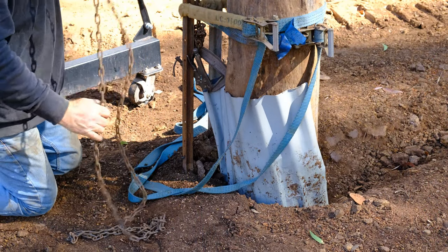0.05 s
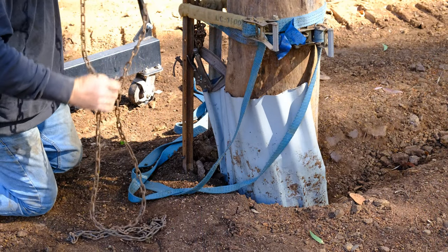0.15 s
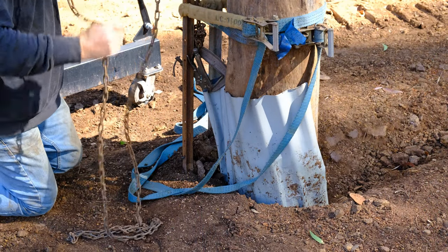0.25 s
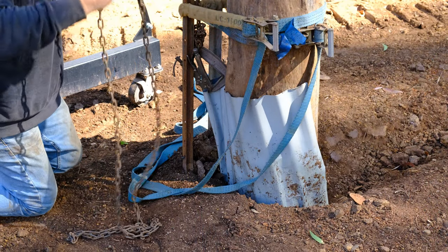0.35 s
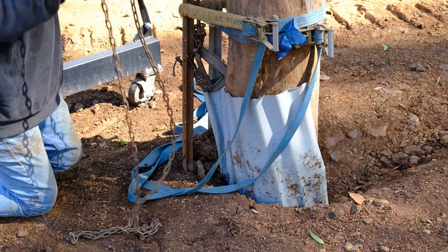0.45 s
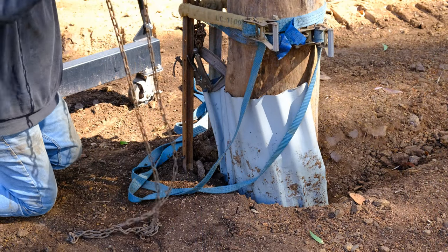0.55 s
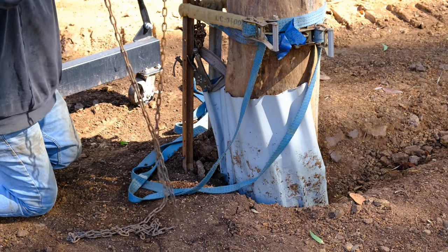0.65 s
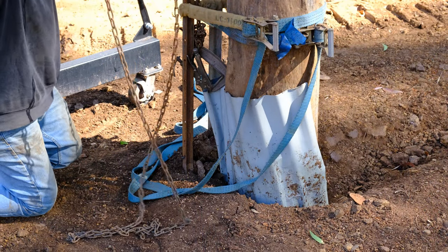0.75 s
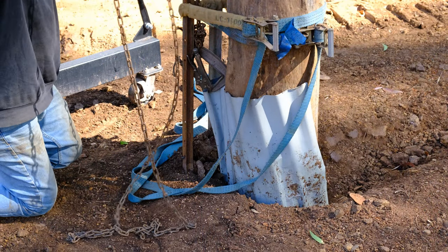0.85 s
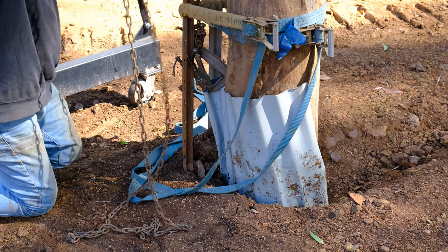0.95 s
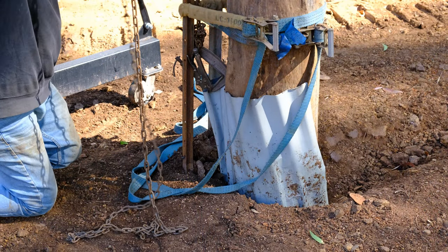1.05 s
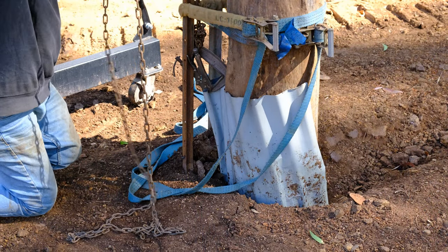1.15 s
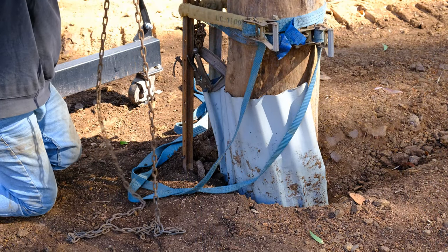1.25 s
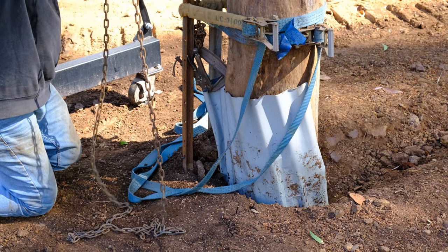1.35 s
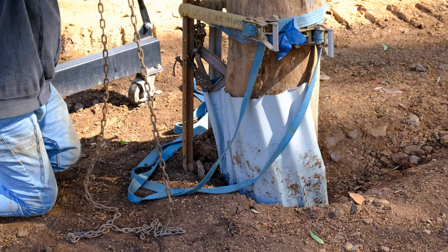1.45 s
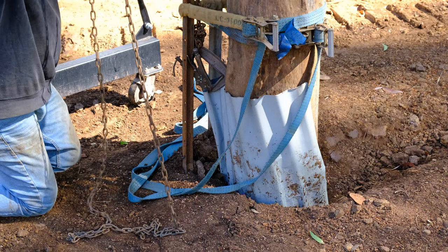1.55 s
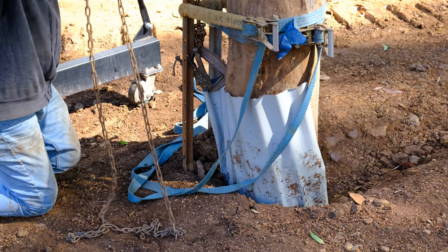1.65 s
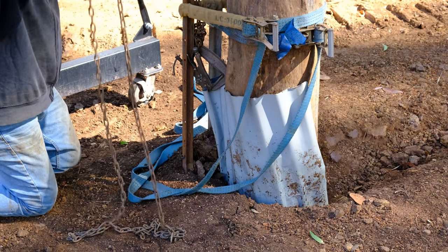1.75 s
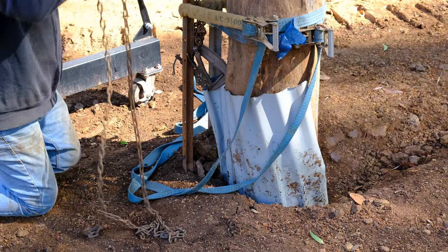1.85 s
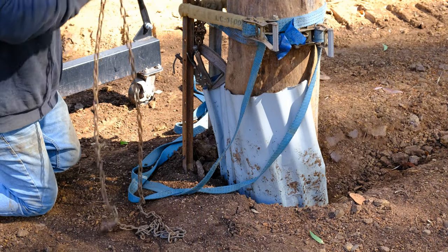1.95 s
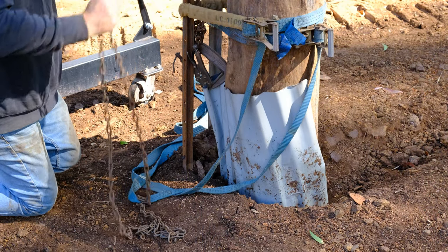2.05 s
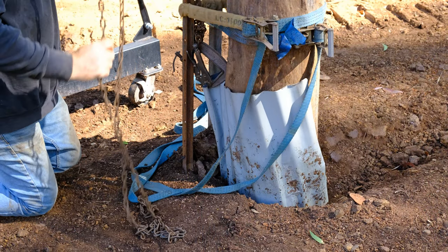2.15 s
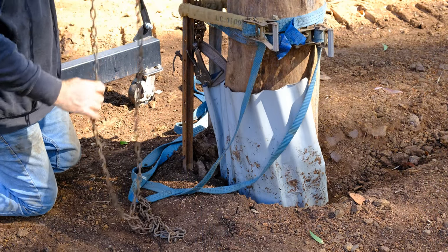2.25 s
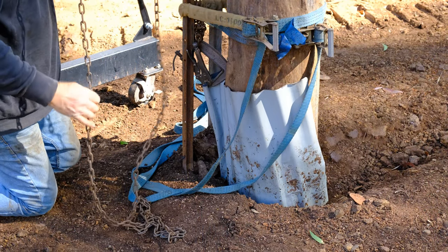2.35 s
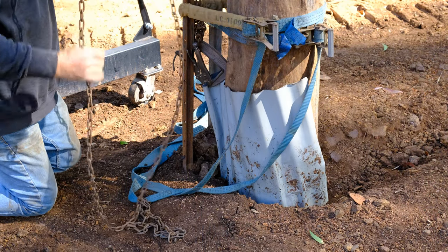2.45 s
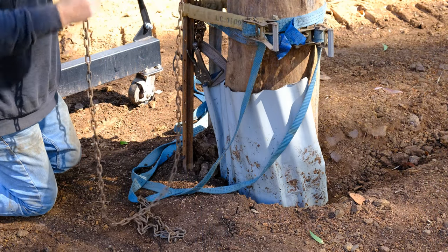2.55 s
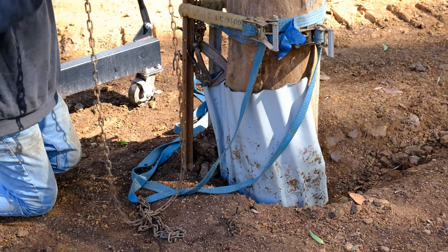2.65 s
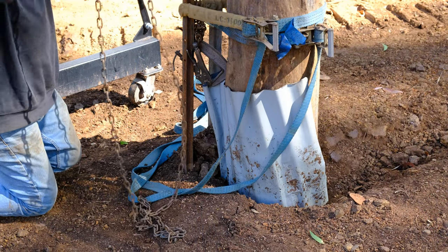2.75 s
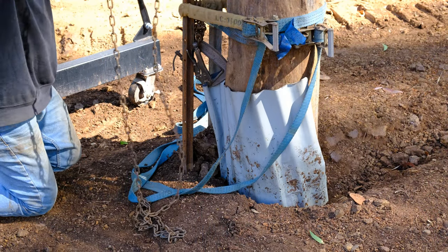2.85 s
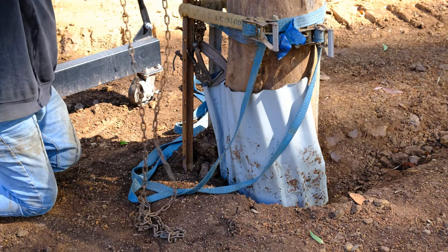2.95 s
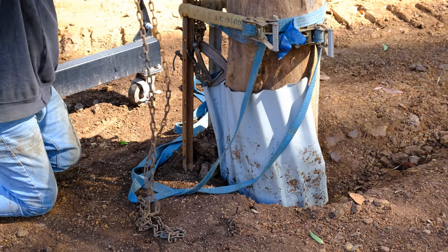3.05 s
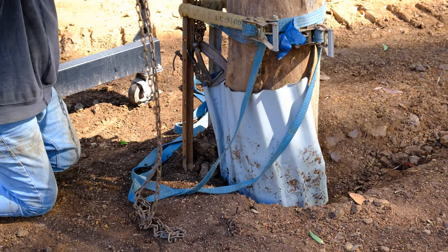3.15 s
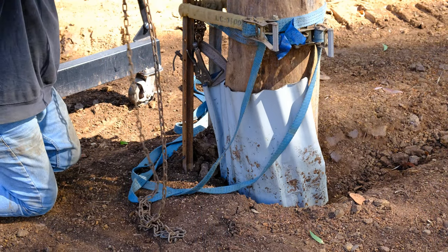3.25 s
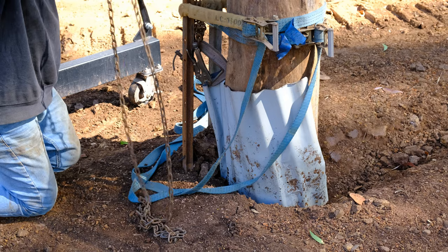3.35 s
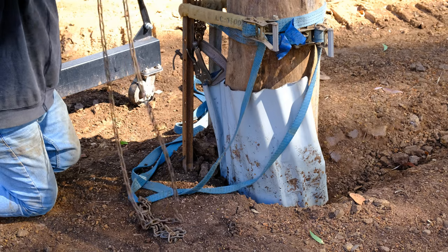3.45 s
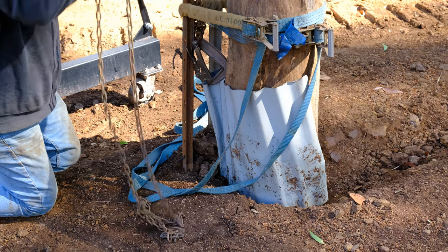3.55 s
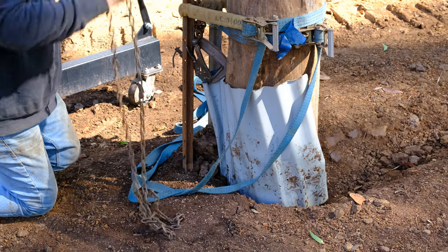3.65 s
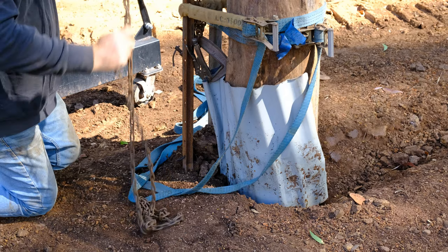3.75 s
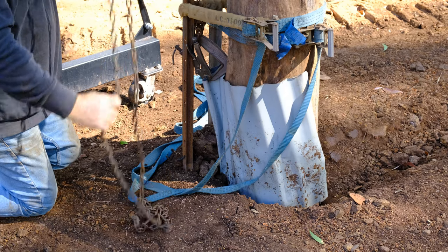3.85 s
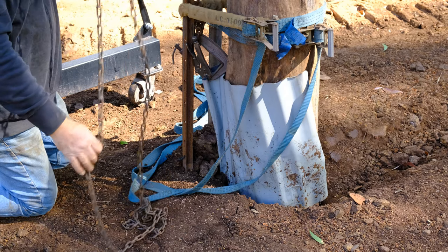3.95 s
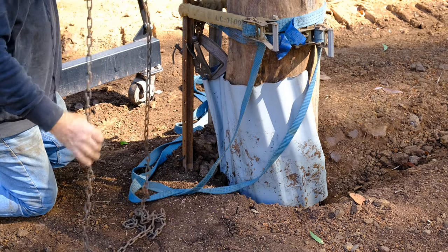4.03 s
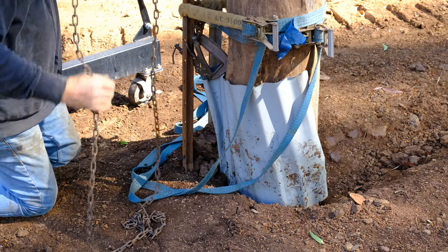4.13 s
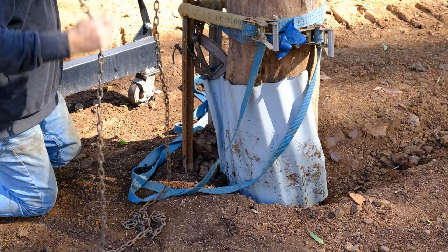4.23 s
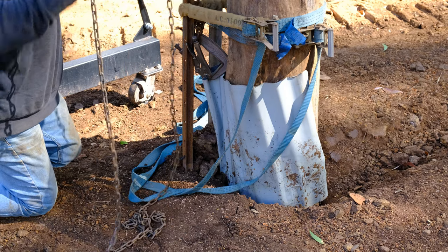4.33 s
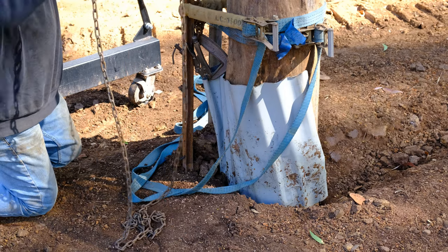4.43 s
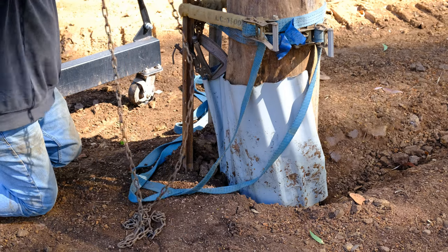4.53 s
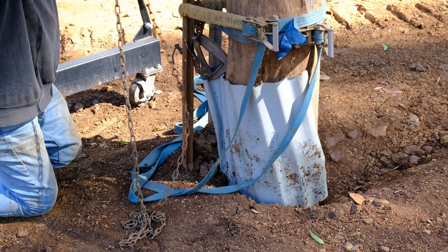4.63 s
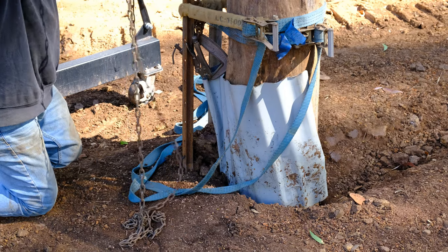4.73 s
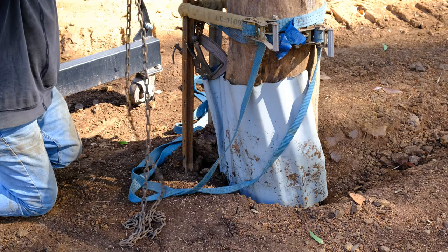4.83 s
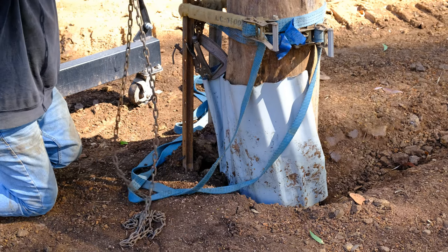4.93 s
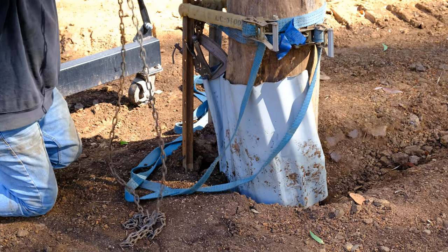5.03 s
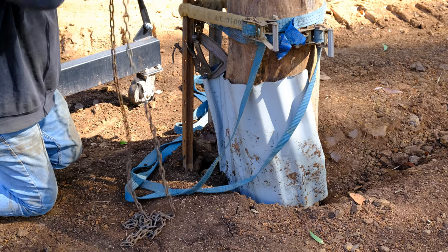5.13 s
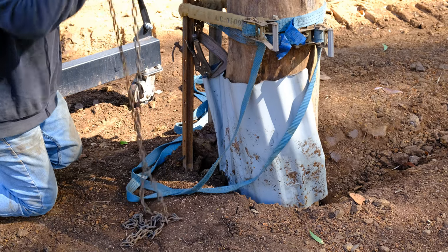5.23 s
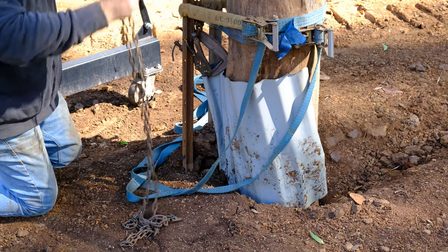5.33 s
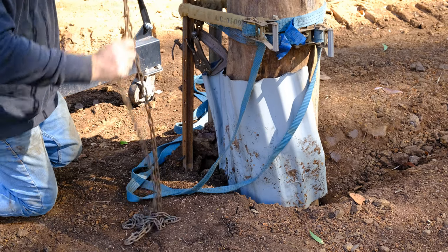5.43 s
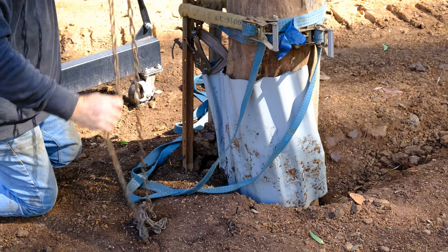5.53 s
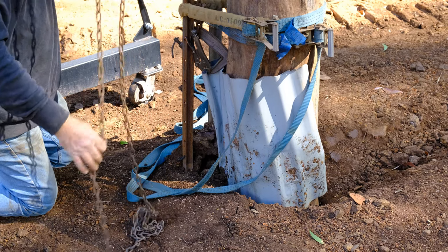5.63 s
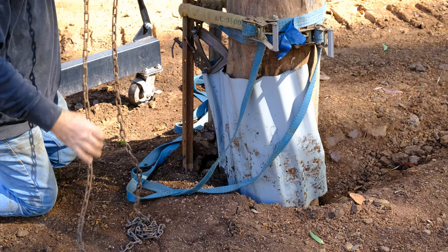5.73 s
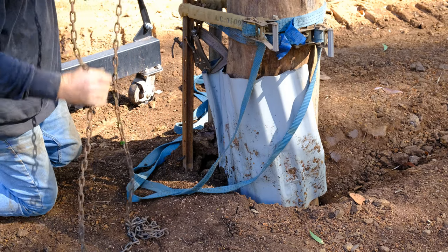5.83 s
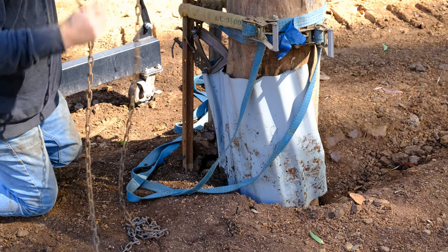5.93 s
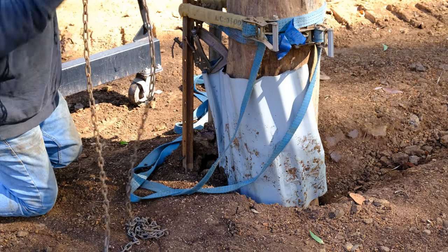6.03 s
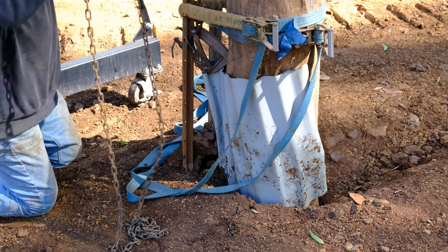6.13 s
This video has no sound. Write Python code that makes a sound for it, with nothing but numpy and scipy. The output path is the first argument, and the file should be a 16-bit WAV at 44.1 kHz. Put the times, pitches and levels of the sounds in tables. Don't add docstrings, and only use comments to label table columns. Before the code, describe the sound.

Close outdoor sound of a geared chain hoist worked by hand. The tail of one pull stops at once, then three longer pulls follow, each a dense metallic ratchet rattle that speeds up and slows down. Between them slack chain clinks, bumps the steel housing, thuds and scrapes on soil, and a latch knocks. Faint wind and distant bird chirps; dry, short reflections, close two-channel microphone.

```python
import sys
import numpy as np
from scipy import signal
from scipy.fft import rfft, irfft
from scipy.io import wavfile
from scipy.ndimage import uniform_filter1d

SR = 44100
rng = np.random.default_rng(int(sys.argv[2]) if len(sys.argv) > 2 else 0)


def transcribe(u):
    v = np.clip(np.atleast_2d(u).T, -1, 1)
    q = np.round(v * 32767).astype(np.int16)
    wavfile.write(sys.argv[1], SR, q)


def nominal_scale(level):
    x = np.asarray(level, float) / 20
    return 10 ** x


N = 272538


def evened(x):
    return x / np.sqrt(np.mean(x ** 2) + 1e-20)


def read(points, hz):
    f, value = np.transpose(points)
    return np.interp(np.log(hz + 1), np.log(f + 1), value)


def curve(rows, column):
    rows = np.asarray(rows)
    return nominal_scale(np.interp(np.arange(N) / SR, rows[:, 0], rows[:, column], left=-150, right=-150))


def strokes(rows):
    t = np.arange(N) / SR
    return sum(nominal_scale(db) * np.exp(-((t - middle) / half) ** 2) for middle, half, db in rows)


def causal(db):
    mirrored = np.r_[db, db[-2:0:-1]]
    log_gain = np.log(nominal_scale(np.maximum(mirrored, -100)))
    taps = np.fft.ifft(np.exp(np.conj(signal.hilbert(log_gain)))).real[:4096]
    return taps / np.linalg.norm(taps)


# (frequency [Hz], width [Hz], level [dB])
MODES = [(793, 50, 6.5), (847, 59, 4.5), (1625, 80, 6), (1917, 140, 2.5), (2500, 55, 7.5), (3010, 90, 6),
         (3300, 180, 2), (4275, 56, -4.5), (5080, 340, -7.5), (5960, 140, -5.5), (6640, 60, -3.5),
         (7320, 320, -11), (8560, 200, -7), (10950, 370, -11)]
# (frequency [Hz], level [dB])
STEEL = [(300, -21), (700, -9.5), (1200, -2.5), (3500, -2.5), (7000, -19), (12000, -18.5), (15000, -20),
         (17000, -65)]


def housing(drive, weight, ring_db=0.):
    hz = np.fft.rfftfreq(8192, 1 / SR)
    modes = np.zeros(len(hz))
    for f, width, db in MODES:
        detuning = 2 * (hz - f) / max(width, 60, f / 70)
        modes += nominal_scale(2 * (db + ring_db)) / (1 + detuning ** 2)
    broad = nominal_scale(2 * read(STEEL, hz))
    db = 10 * np.log10(broad + modes) + read(weight, hz)
    return signal.oaconvolve(drive, causal(db))[:N]


def blows(times, dbs, falls, rise, grit_db, colour_db):
    t, out = np.arange(2048) / SR, np.zeros(N + 2048)
    noise, grit, colour = rng.standard_normal((3, len(times), len(t)))
    colour = evened(uniform_filter1d(colour[:, :len(t) // 2 + 1], size=25, axis=1))
    chatter = irfft(rfft(noise * nominal_scale(grit_db * grit)) * nominal_scale(colour_db * colour))
    falls = falls * np.ones(len(times)) + 1e-4
    for s, db, fall, grains in zip(times, dbs, falls, chatter):
        envelope = (1 - np.exp(-t / rise)) * np.exp(-t / fall)
        out[round(s * SR):][:len(t)] += nominal_scale(db) * evened(grains) * envelope
    return out[:N]


def rough_noise(points, lumps_db, size):
    lumps = evened(uniform_filter1d(rng.standard_normal(N), size))
    colour = nominal_scale(read(points, np.fft.rfftfreq(N, 1 / SR)))
    noise = irfft(rfft(rng.standard_normal(N)) * colour, N)
    return evened(noise * nominal_scale(lumps_db * lumps))


# (time [s], ratchet teeth passed)
TURNS = [
    [(0, .23), (0.0527, 4), (0.0924, 7)],
    [(1.5642, 0), (1.6205, 1), (1.7196, 4), (1.8856, 13), (2.0355, 23), (2.1655, 32), (2.2705, 39),
     (2.3294, 42), (2.3633, 43)],
    [(3.3581, 0), (3.402, 1), (3.479, 4), (3.6144, 13), (3.7489, 25), (3.8832, 38), (3.9857, 46),
     (4.0314, 48)],
    [(5.0248, 0), (5.0689, 1), (5.1504, 4), (5.3098, 14), (5.4825, 29), (5.5918, 38), (5.6915, 44),
     (5.7186, 45)],
]


def turning():
    out = []
    for s, teeth in map(np.transpose, TURNS):
        law = np.polyfit(s - s.mean(), teeth, min(len(s) - 1, 6))
        start = round(s[0] * SR) - 100 * (s[0] > 0)
        t = np.arange(start, round(s[-1] * SR) + 100) / SR
        passed = np.polyval(law, t - s.mean())
        out.append((t, passed, np.gradient(passed) * SR / 75))
    return out


def tooth_drops():
    out = []
    for pull, (t, passed, speed) in enumerate(turning()):
        teeth = np.arange(1. if pull == 0 else 0., passed[-1])
        out.append([np.interp(teeth, passed, t), np.interp(teeth, passed, speed), pull + 0 * teeth])
    return np.concatenate(out, axis=1)


# (pawl level [dB], rattle at full speed [dB], drone at full speed [dB])
PULLS = [
    (-36.5, -44, -50),
    (-35.5, -44.5, -49.5),
    (-35.5, -43.5, -48),
    (-35, -42.5, -48.5),
]


def running(column, law):
    gain = np.zeros(N)
    for row, (t, passed, speed) in zip(PULLS, turning()):
        gain[round(t[0] * SR):][:len(t)] = nominal_scale(row[column]) * speed ** law
    coast_s = 0.032
    keep = np.exp(-1 / (coast_s * SR))
    return signal.lfilter([1 - keep], [1, -keep], gain, zi=[gain[0]])[0]


# (frequency [Hz], level [dB])
PAWL_TIP = [(500, -14), (1500, -17), (4000, -10), (8000, 2.5), (11000, 5), (16000, 4.5)]


def ratchet():
    s, _, pull = tooth_drops()
    db = np.transpose(PULLS)[0][pull.astype(int)] + 3.0 + 2.0 * rng.standard_normal(len(s))
    db = db + 2.5 * (np.diff(pull, prepend=0) > 0)
    db = db - 2.5 * (np.diff(pull, append=9) > 0)
    snaps = blows(s, db, falls=.0042, rise=.0006, grit_db=3.5, colour_db=3.0)
    return housing(snaps, PAWL_TIP, ring_db=-5.)


def ping(drive):
    t = np.arange(SR // 4) / SR
    return signal.oaconvolve(drive, nominal_scale(-60 * t / .11) * np.sin(2 * np.pi * 3004 * t))[:N]


# (time [s], level [dB])
SEATS = [(0.0215, -35), (0.0514, -34), (0.0834, -28.5), (1.629, -28), (1.716, -39), (1.7639, -33),
         (1.7852, -26.5), (1.8127, -25), (1.837, -27), (1.8696, -28), (1.9038, -24.5), (1.94, -23.5),
         (1.9787, -30), (2.014, -25), (2.0557, -23.5), (2.0916, -24), (2.1282, -33), (2.1636, -32),
         (2.2024, -29), (2.2405, -24), (2.282, -26), (3.4648, -21.5), (3.5134, -25), (3.5585, -24),
         (3.5913, -21.5), (3.6225, -19), (3.6516, -29), (3.6805, -26), (3.7084, -30), (3.7369, -20),
         (3.7645, -22), (3.7901, -20), (3.8171, -21), (3.842, -21.5), (3.8698, -23.5), (3.8971, -35),
         (3.9305, -19.5), (3.9619, -28), (4.006, -33.5), (5.0634, -31), (5.1347, -27), (5.1877, -32),
         (5.2085, -35), (5.2434, -32), (5.2695, -27), (5.3014, -21.5), (5.3332, -25), (5.3587, -25),
         (5.3949, -30), (5.4231, -21.5), (5.452, -23), (5.4804, -23), (5.512, -26), (5.54, -21.5),
         (5.5732, -25), (5.6077, -25.5), (5.652, -29), (5.6948, -26.5)]
# (time [s], level [dB], length [s])
ROCKS = [
    (0.168, -49, 0.019),
    (2.284, -53, 0.067),
    (2.949, -45, 0.013),
    (3.314, -53, 0.012),
    (4.683, -48.5, 0.025),
    (4.967, -55, 0.025),
]
# (frequency [Hz], level [dB])
LINK_SEAT = [(400, -31.5), (900, 0), (1300, -3.5), (1900, 3), (3000, -2), (3800, 7.5), (6000, 5),
             (12000, -35.5)]
LOOSE = [(500, -27.5), (1400, -4.5), (3000, -4.5), (8000, 4), (16000, 2)]
COVER = [(200, -69.5), (500, -6.5), (680, -4), (950, -1.5), (1300, -23)]


def wheel():
    tooth_s, speed, pull = tooth_drops()
    jolt_db = -37.5 - 9.4 * np.log10(np.maximum(speed * 3, .8)) + 2.5 * rng.standard_normal(len(tooth_s))
    jolt_db = jolt_db - 2.5 * (np.diff(pull, append=9) > 0)
    climb_s = .0045

    s, db = np.transpose(SEATS)
    seats = blows(s, db - 2.5, falls=.005, rise=0.0005, grit_db=2.0, colour_db=2.0)
    pinged = nominal_scale(-35.5) * ping(seats)
    seats = seats + blows(tooth_s, jolt_db + 6.0, falls=0.0064, rise=0.00098, grit_db=2.0, colour_db=1.5)
    seats = seats + blows(tooth_s - climb_s, jolt_db + 5.0, falls=0.004, rise=0.00051,
                          grit_db=2.5, colour_db=-0.5)
    out = nominal_scale(-7.5) * housing(seats, LINK_SEAT, ring_db=3.) + nominal_scale(-18.5) * housing(seats, COVER, ring_db=10.0)
    out = out + pinged

    strength = nominal_scale(2.54 * np.minimum(rng.exponential(1, N), 5))
    taps = strength * (rng.random(N) < 2500. / SR) * rng.choice([-1, 1], N)
    loose = evened(housing(taps, LOOSE, ring_db=-3.))
    shake = uniform_filter1d(abs(seats), size=250) + 1e-5
    throb = (shake / uniform_filter1d(shake, size=2500)) ** .4
    out = out + nominal_scale(0.5) * loose * running(column=1, law=1.15) * throb

    drone = running(column=2, law=0.6)
    for s, db, length in ROCKS:
        part = drone[round(s * SR):][:round(length * SR)]
        part += nominal_scale(db) * np.hanning(len(part))
    cover = evened(housing(np.roll(taps, N // 2), COVER, ring_db=-4.0))
    gears = rough_noise([(120, -16.0), (190, -5.0), (330, 4.0), (420, 0.0), (600, -3), (800, -13)],
                        lumps_db=1.0, size=600)
    return out + nominal_scale(-2.5) * cover * drone * throb + nominal_scale(-3.5) * gears * uniform_filter1d(drone, size=4000)


# (time [s], level [dB])
WIND = [
    (0, -83),
    (.5, -65),
    (1.2, -74),
    (2.3, -81.5),
    (3.0, -60),
    (3.5, -81),
    (4.6, -66.5),
    (5.6, -85),
    (6.18, -57),
]


def wind():
    rumble = rough_noise([(15, -4.5), (35, 1), (70, 0.5), (130, -3.5), (220, -44)], lumps_db=3., size=3000)
    return nominal_scale(-6.5) * rumble * curve(WIND, column=1)


# (middle [s], half length [s], level [dB])
DRAG = [(0.23, 0.055, -52.5), (0.26, 0.018, -48), (0.31, 0.12, -56), (0.56, 0.019, -56), (1.2, 0.012, -55),
        (1.265, 0.02, -65), (2.436, 0.0076, -51), (5.96, 0.025, -64), (0.5, 0.043, -56), (0.62, 0.051, -53),
        (0.74, 0.1, -61.5), (1.076, 0.046, -55), (1.23, 0.016, -56), (1.306, 0.037, -52),
        (1.55, 0.028, -50.5), (2.48, 0.126, -53.5), (2.72, 0.23, -67), (2.93, 0.071, -58),
        (3.2, 0.33, -62.5), (3.369, 0.07, -42), (4.11, 0.015, -52), (4.21, 0.055, -44.5),
        (4.405, 0.12, -54), (4.643, 0.0725, -54.5), (4.983, 0.075, -53.5), (5.857, 0.2, -54),
        (6.016, 0.067, -84), (6.17, 0.14, -56.5)]
# (frequency [Hz], level [dB per Hz])
SCRAPE = [(300, -48), (550, -17), (800, 9), (1700, 2), (3500, -4.5), (8000, -14.5), (14000, -24)]


def soil():
    scrape_gain = nominal_scale(-67.5) + strokes(DRAG)
    stir_gain = nominal_scale(-65.9) * (scrape_gain / nominal_scale(-52.0)) ** 0.36
    scrape = rough_noise(SCRAPE, lumps_db=2.0, size=120)
    stir = rough_noise([(80, -21), (150, -4.5), (300, 0.5), (450, -0.5), (800, -6.0), (1200, -28.0)],
                       lumps_db=-0.5, size=900)
    return nominal_scale(-10.5) * scrape * scrape_gain + stir * stir_gain


# (time [s], level [dB])
CLINKS = [(0.177, -43), (0.2321, -46), (0.326, -47), (0.4631, -57), (0.4804, -49), (0.631, -48),
          (0.73, -44), (0.7973, -45), (0.8363, -36.5), (0.915, -47.5), (0.9975, -50.5), (1.3014, -52),
          (2.6241, -40), (2.6504, -41.5), (2.8487, -45), (3.1356, -48), (3.287, -46), (3.312, -44),
          (4.0696, -48), (4.1344, -42), (4.1717, -53), (4.2672, -45.5), (4.436, -53), (4.6226, -45.5),
          (4.64, -45), (4.7004, -37.5), (4.7178, -50), (4.7265, -48), (4.7365, -54), (4.758, -49),
          (4.8031, -49.5), (4.851, -52), (1.104, -56), (3.3578, -25), (0.662, -45), (1.5865, -55),
          (1.651, -40), (4.956, -50), (5.857, -48), (6.009, -45),
          (0.3114, -45), (0.3546, -48), (0.3601, -50), (0.3732, -39), (0.388, -47), (0.3984, -54),
         (0.412, -53), (0.5711, -49), (0.588, -53), (0.6004, -57), (0.669, -40.5), (0.6744, -47),
         (0.701, -58), (0.7068, -44.5), (0.8454, -45.5), (0.891, -57), (2.4069, -52), (2.5204, -53),
         (2.6878, -50), (2.7046, -44), (2.719, -53), (2.7347, -46), (2.744, -46.5), (2.7726, -53),
         (3.1532, -49), (3.1747, -37.5), (3.1824, -43), (3.1974, -50.5), (3.2105, -39), (3.229, -45.5)]
# (frequency [Hz], level [dB])
CLINK = [(2000, -35), (5000, -5), (9000, 2.5), (13000, 5), (16000, 10.5)]


def clinks():
    s, db = np.transpose(CLINKS)
    falls = .0018 * nominal_scale(.4 * (db + 33.))
    hits = blows(s, db - 3., falls, rise=.00005, grit_db=5.0, colour_db=2.0)
    return housing(hits, CLINK, ring_db=-26.0)


# (time [s], ring level [dB], cover hum level [dB], clank level [dB])
BUMPS = [(0.2687, -33.5, -27.5, -34.5), (0.52, -42, -70, -34.5), (0.5494, -40.5, -52, -70),
         (0.606, -55, -54, -70), (0.6535, -56, -65.5, -39.5), (0.7737, -54, -73, -40),
         (1.047, -39, -45, -31.5), (1.0651, -66, -42, -70), (1.1202, -32, -38.5, -28),
         (1.151, -47, -70, -70), (1.1897, -47.5, -52, -70), (1.3485, -39.5, -37, -64),
         (1.4396, -31, -30.5, -29), (1.5396, -39, -53.5, -65), (1.593, -53, -73, -41),
         (1.8135, -34, -29, -67), (2.4434, -39, -31, -33.5), (3.1574, -44, -48, -63),
         (4.1604, -48, -40.5, -70), (4.2241, -34, -36, -62.5), (4.2373, -40.5, -34, -34),
         (4.3625, -53, -46.5, -73), (4.4551, -34.5, -40, -67), (4.8738, -37.5, -69, -42.5),
         (4.8827, -40, -41, -70), (5.014, -30.5, -63, -70), (5.8087, -38.5, -79, -33),
         (5.9392, -38, -30.5, -43.5), (5.9763, -76, -47, -64), (6.0008, -42.5, -41.5, -68)]
# (time [s], level [dB])
THUDS = [(0.2683, -48.5), (0.5207, -59.5), (0.606, -62.5), (1.0654, -63.5), (1.3488, -61), (1.813, -49.5),
         (2.4414, -45.5), (4.1585, -72), (4.224, -58), (4.2392, -51.5), (5.9399, -47.5), (5.9763, -59),
         (6.0003, -58)]
# (frequency [Hz], level [dB])
KNOCK_ON_FRAME = [(400, -37), (900, 0.5), (1500, 8), (3500, 0), (6000, 2), (12000, -27)]
THUD = [(100, -55), (190, 7), (370, 11), (600, 0.5), (900, -12), (3000, -41)]
CLANK = [(2000, -22), (5000, 0.5), (9000, 5), (16000, -1.5)]


def bumps():
    s, ring_db, hum_db, clank_db = np.transpose(BUMPS)
    rings = blows(s, ring_db - 5.0, falls=0.0047, rise=0.000075, grit_db=1.0, colour_db=2.0)
    hums = np.bincount(np.round((s + 0.0016) * SR).astype(int), nominal_scale(hum_db + 14.0), N)
    clank_falls = .003 * nominal_scale(.35 * (clank_db + 33.))
    clanks = blows(s, clank_db - 5.5, clank_falls, rise=.0002, grit_db=4.0, colour_db=3.0)

    s, db = np.transpose(THUDS)
    thuds = blows(s, db + 9.0, falls=0.017, rise=0.0037, grit_db=1.0, colour_db=-2.0)
    slides = blows(s, db + 11.0, falls=0.008, rise=0.0047, grit_db=7.5, colour_db=-3.5)
    out = housing(rings, KNOCK_ON_FRAME, ring_db=-6.0) + housing(hums, COVER, ring_db=15.0)
    out = out + housing(clanks, CLANK, ring_db=-6.5) + housing(thuds, THUD, ring_db=-43.0)
    return out + housing(slides, KNOCK_ON_FRAME, ring_db=-5.0)


# (middle [s], half length [s], level [dB])
SWAYS = [
    (0.4, .15, -67),
    (0.7, 0.13, -63),
    (2.7, 0.19, -73),
    (3.2, 0.059, -67),
    (4.15, 0.074, -58),
    (6.0, 0.6, -72),
]
# (frequency [Hz], level [dB])
TICK = [(3000, -32), (6000, -3.5), (10000, -3), (14000, 5)]


def sway():
    place, chance = rng.random((2, int(110 * N / SR)))
    s = place * (N - 1) / SR
    sway_db = 20 * np.log10(strokes(SWAYS)[(s * SR).astype(int)] + 1e-9)
    db = sway_db - 4.5 * np.log(chance + .08)
    return housing(blows(s, db, falls=0.0028, rise=.0001, grit_db=3.0, colour_db=1.5), TICK, ring_db=-4.5)


# (time [s], level [dB], frequency [Hz], t60 [s])
PINGS = [(1.121, -60, 5012, 0.14), (1.19, -70, 5012, .12), (1.348, -44.5, 3650, .015),
         (1.44, -30, 3660, .02), (1.8135, -35, 673, 0.066), (0.522, -46, 2500, 0.049),
         (2.589, -54, 2300, .012), (1.594, -44, 5270, 0.032), (3.327, -53, 3120, 0.2),
         (4.249, -50, 3010, 0.092), (4.76, -52, 5500, 0.038), (4.76, -60, 8950, .03),
         (5.808, -42.5, 3025, .11)]


def singing():
    t, out = np.arange(SR // 4) / SR, np.zeros(N + SR)
    for s, db, hz, t60 in PINGS:
        out[round(s * SR):][:len(t)] += nominal_scale(db - 60 * t / t60) * np.sin(2 * np.pi * hz * t)
    flutter = evened(uniform_filter1d(rng.standard_normal(N), size=150))
    return out[:N] * nominal_scale(3. * flutter)


# (time [s], level [dB], snap above the ring [dB])
KNOCKS = [
    (0.9144, -29, 0.67),
    (1.3563, -31.5, 3.5),
    (2.9805, -40.5, 1),
    (4.7026, -29, 15.5),
]
# (frequency [Hz], level [dB], t60 [s])
LATCH = [(465, -15, 0.07), (760, -20, 0.028), (905, -7.5, 0.047), (1100, -14, 0.075), (1397, 2.5, 0.043),
         (1548, -1, 0.036), (2080, -8.5, 0.068), (2450, -15, 0.0215), (2500, -14, 0.018), (3450, -9, 0.016),
         (4600, -22, 0.011)]
# (frequency [Hz], level [dB])
SHUDDER = [(200, -45), (600, 5), (1400, -1), (2300, -19), (3200, -28), (8000, -40)]


def latch():
    t, out = np.arange(4096) / SR, np.zeros(N + 4096)
    for s, db, snap_db in KNOCKS:
        ring = np.zeros(len(t))
        for hz, level, t60 in LATCH:
            level_shift, detune, phase = [2., .006, .4] * rng.standard_normal(3)
            tone = np.sin(2 * np.pi * hz * (1 + detune) * t + phase)
            ring += nominal_scale(level + level_shift - 60 * t / t60) * tone
        ring = ring * (1 - np.exp(-(t / 0.00083) ** 2))
        snap_t = t - .0005
        snap = np.cos(2 * np.pi * 2410.0 * snap_t + .5) * np.exp(-(snap_t / 0.0002157) ** 2)
        out[round(s * SR):][:len(t)] += nominal_scale(db) * (ring / abs(ring).max() + nominal_scale(snap_db) * snap)
    s, db, _ = np.transpose(KNOCKS)
    shudder = blows(s + 0.0029, db - 12.5, falls=0.019, rise=0.0022, grit_db=0.0, colour_db=6.5)
    return out[:N] + housing(shudder, SHUDDER, ring_db=-9.0)


# (time [s], level [dB], frequency [Hz], width [s])
PUFF = (1.041, -56, 30, .012)


def puff():
    s, db, hz, width = PUFF
    t = np.arange(N) / SR - s
    return nominal_scale(db) * np.cos(2 * np.pi * hz * t) * np.exp(-(t / width) ** 2)


# (time [s], level [dB])
CHIRPS = [
    (4.296, -66),
    (4.381, -63),
    (4.536, -62),
    (4.619, -60),
    (4.781, -67),
    (4.946, -64),
]


def bird():
    out, hz = np.zeros(N), np.linspace(3100, 2000, round(.03 * SR))
    whistle = np.sin(2 * np.pi * np.cumsum(hz) / SR) * np.hanning(len(hz))
    for s, db in CHIRPS:
        out[round(s * SR):][:len(hz)] += nominal_scale(db) * whistle
    roughness = evened(uniform_filter1d(rng.standard_normal(N), size=120))
    return out * nominal_scale(2.5 * roughness)


def yard(x):
    t = np.arange(SR // 4) / SR
    tail = rng.standard_normal(len(t)) * nominal_scale(-60 * t / 0.067) * (t > .004)
    tail = signal.lfilter([1], [1, -.6], tail)
    return nominal_scale(-13.5) * signal.oaconvolve(x, tail / np.linalg.norm(tail))[:N]


# (frequency [Hz], left over right [dB])
LEFT_DB = [(700, 0), (2000, 1.2), (4000, 2), (8000, 7), (10500, 9), (12500, 1.5)]
# (frequency [Hz], phase by which left leads [rad])
LEAD = [(1500, 0), (3600, .3), (5200, .9), (8400, 1.3), (10200, .5), (16000, 1.2)]
# (frequency [Hz], level [dB])
SCATTER = [(60, -27.5), (250, -53), (500, -58), (1000, -37), (2000, -12.5), (4000, -5.5), (8000, -8),
           (15000, -6)]


def ports(x):
    hz, _, z = signal.stft(x, SR, nperseg=256)
    phase = np.repeat(rng.random((z.shape[1], 33)), 4, axis=1)[:, :len(hz)].T
    scatter = np.exp(2j * np.pi * phase)
    ratio = nominal_scale(read(LEFT_DB, hz))
    shading = (ratio - 1) / (ratio + 1)
    delay = 1j * np.tan(read(LEAD, hz) / 2)
    z = z * ((shading + delay)[:, None] + nominal_scale(read(SCATTER, hz))[:, None] * scatter)
    side = signal.istft(z, SR, nperseg=256)[1][:N]
    return np.array([x + side, x - side])


def scene():
    hoist = ratchet() + wheel() + clinks() + bumps() + sway() + singing()
    ground = wind() + soil()
    knocks, gust, chirps = latch(), puff(), bird()
    reflected = yard(hoist + nominal_scale(-13.0) * knocks + nominal_scale(7.0) * chirps)
    return ports(hoist + knocks + nominal_scale(0.5) * chirps + reflected + ground + gust)


def low_pass(x):
    return signal.sosfilt(signal.butter(12, 16660, fs=SR, output="sos"), x)


# (frequency [Hz], level [dB])
HISS = [(100, -55), (500, -8), (2000, 4.5), (4000, -8), (8000, -14), (13000, -15), (16000, -16)]
# (time [s], level [dB])
HISS_DRIFT = [(0, 5), (0.6, 7), (0.9, 2.5), (1.2, 6), (1.5, 2), (2.5, 4), (3.2, 9), (4.2, 8), (4.8, 7.5),
              (5.9, 5), (6.2, 6)]


def record(dry):
    hiss = np.array([rough_noise(HISS, lumps_db=-4.0, size=500) for _ in dry])
    mix = dry + nominal_scale(-74.0) * curve(HISS_DRIFT, column=1) * hiss
    above_edge = np.fft.rfftfreq(N, 1 / SR) - 15900
    edge = nominal_scale(-24. * np.clip(above_edge / 240.0, 0, 1))
    return low_pass(irfft(rfft(mix) * edge, N))


dry = scene()
out = record(dry)
transcribe(out)
```